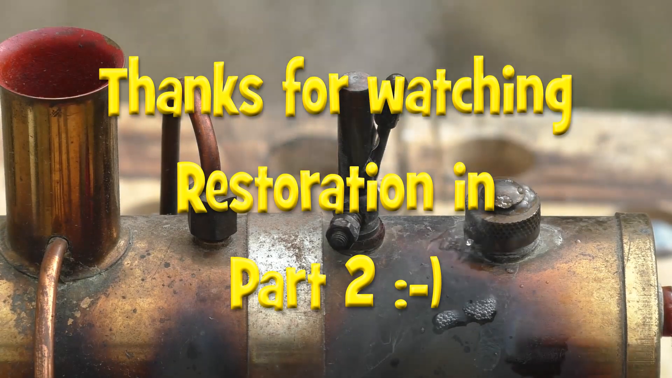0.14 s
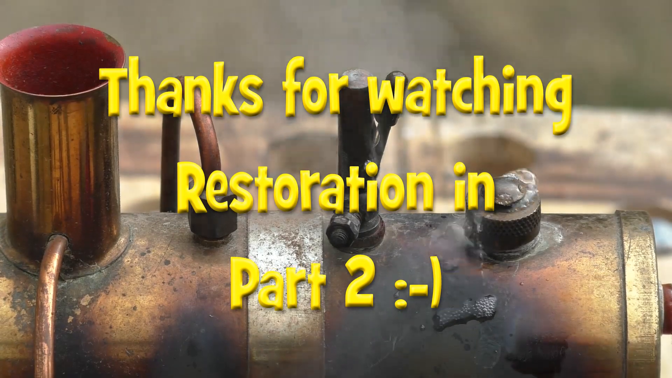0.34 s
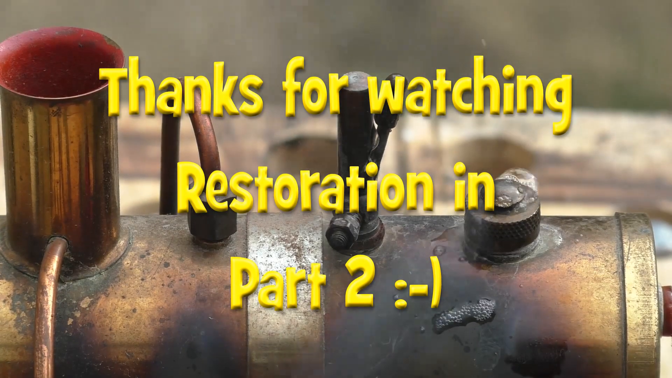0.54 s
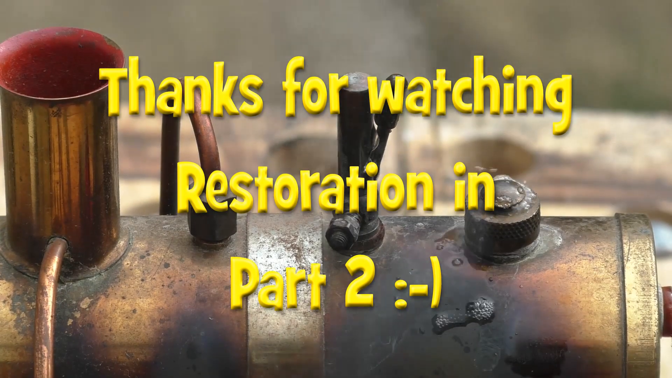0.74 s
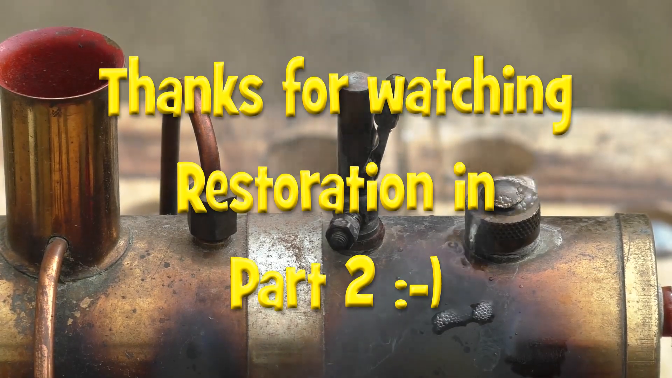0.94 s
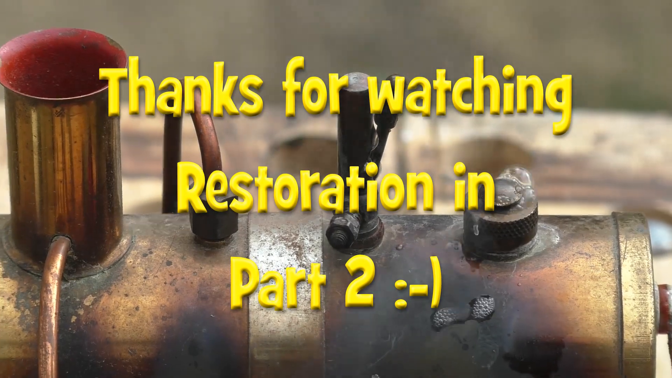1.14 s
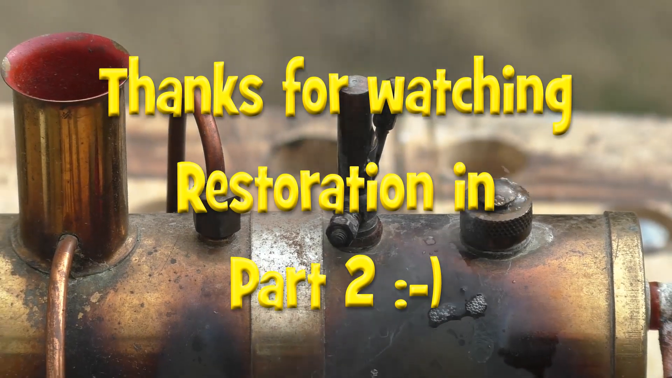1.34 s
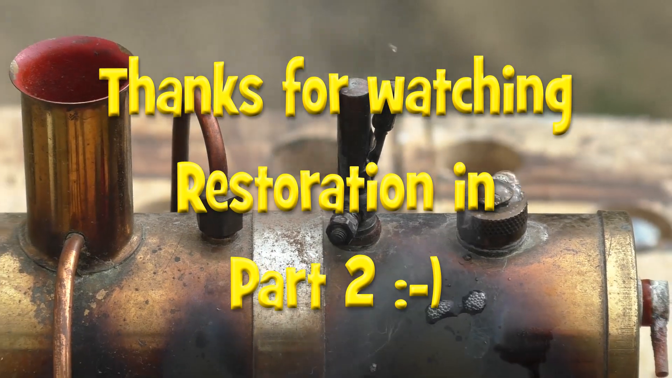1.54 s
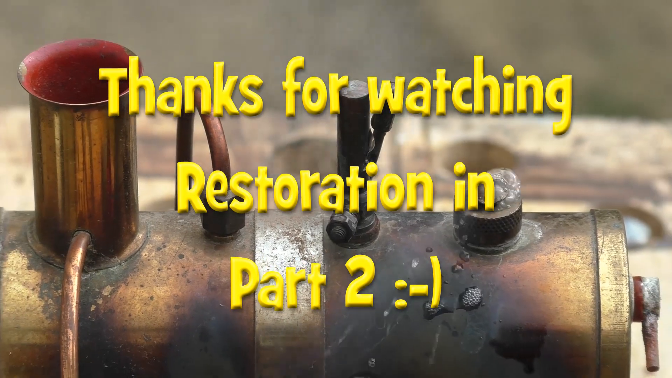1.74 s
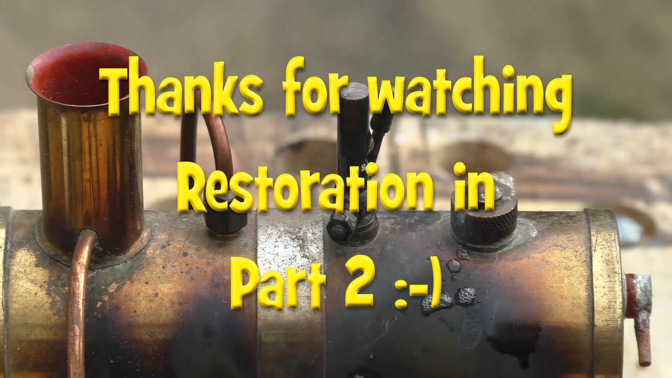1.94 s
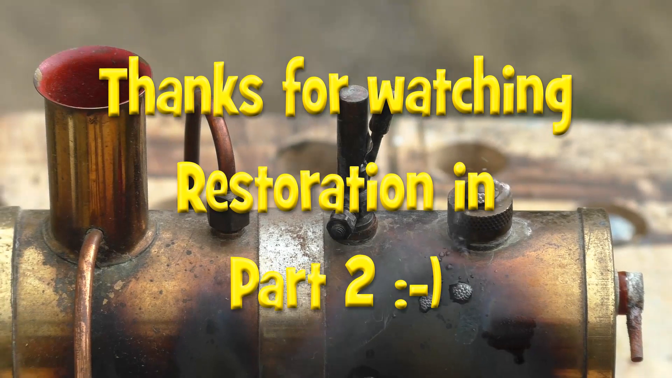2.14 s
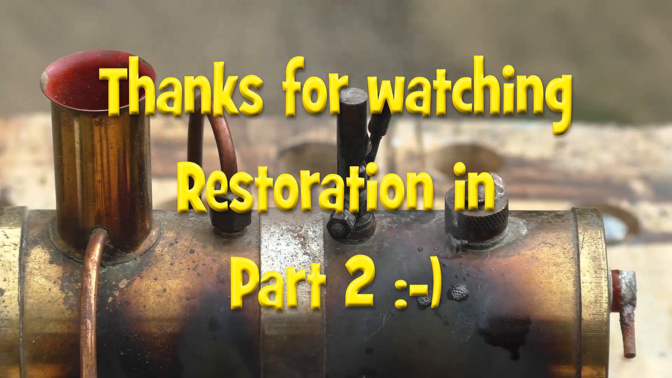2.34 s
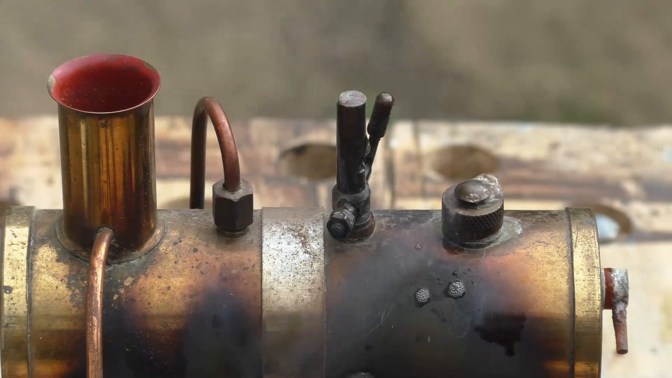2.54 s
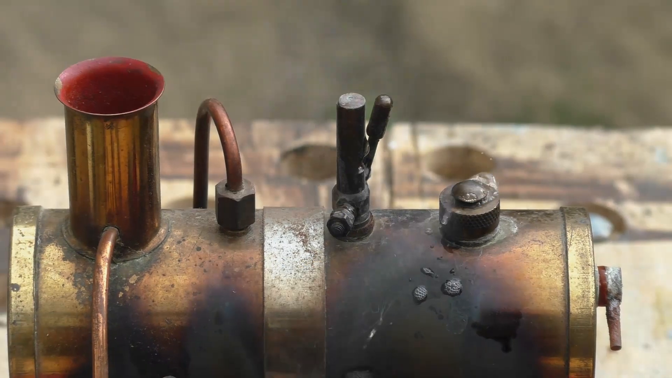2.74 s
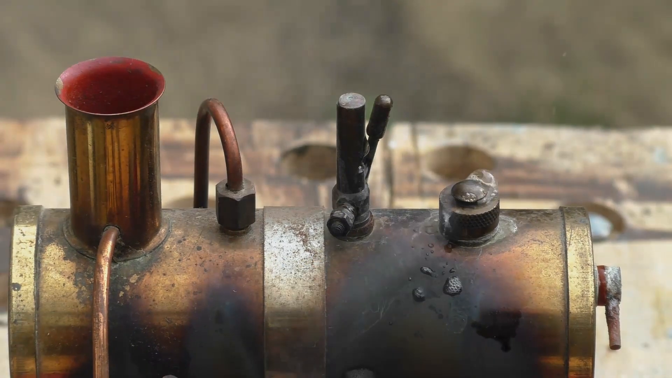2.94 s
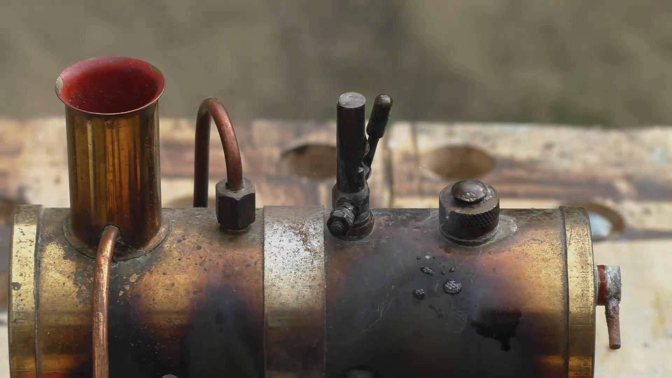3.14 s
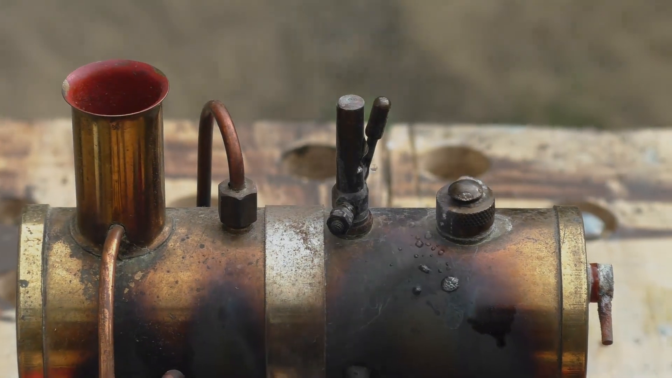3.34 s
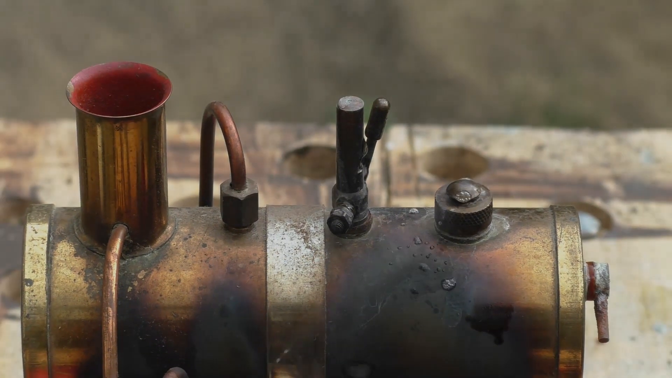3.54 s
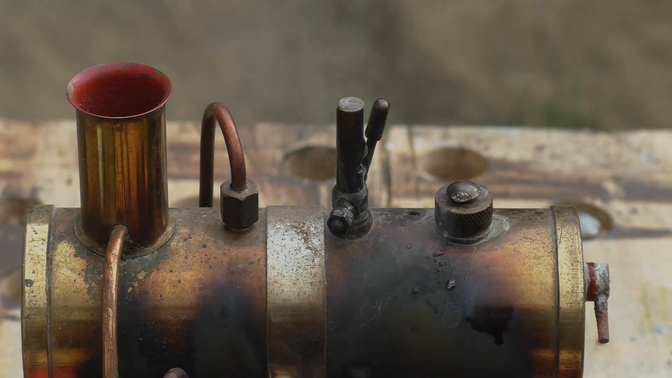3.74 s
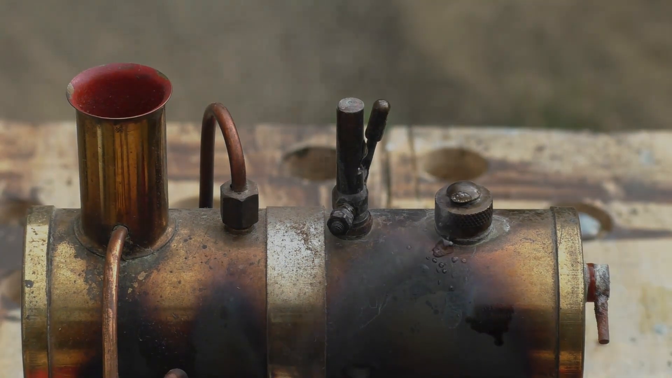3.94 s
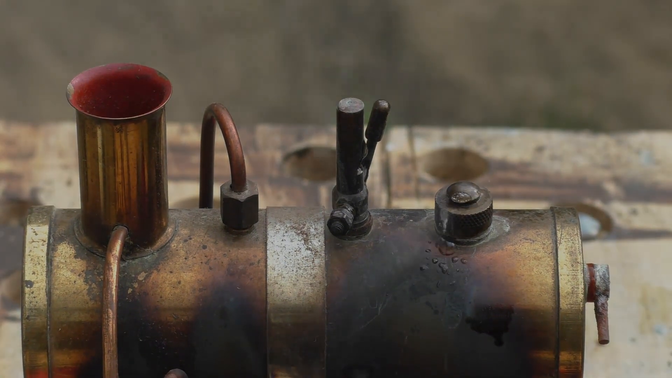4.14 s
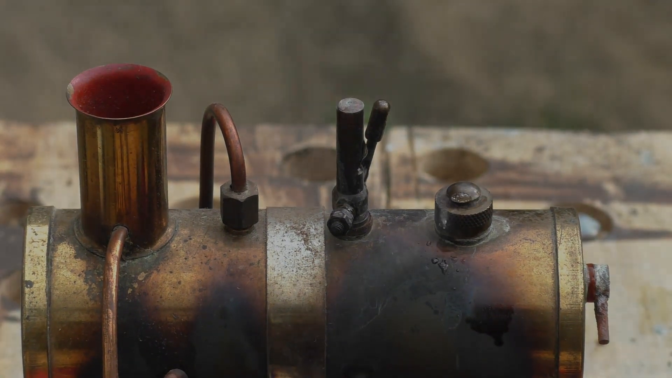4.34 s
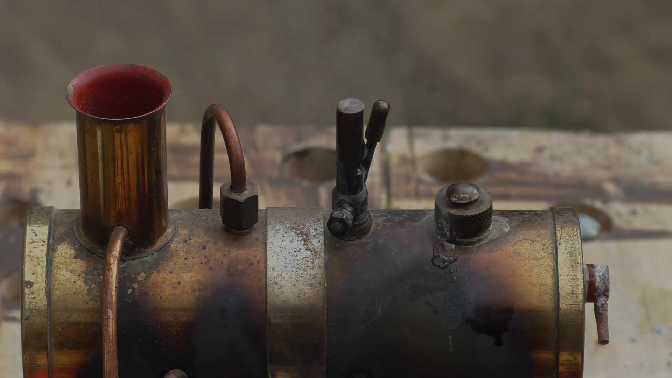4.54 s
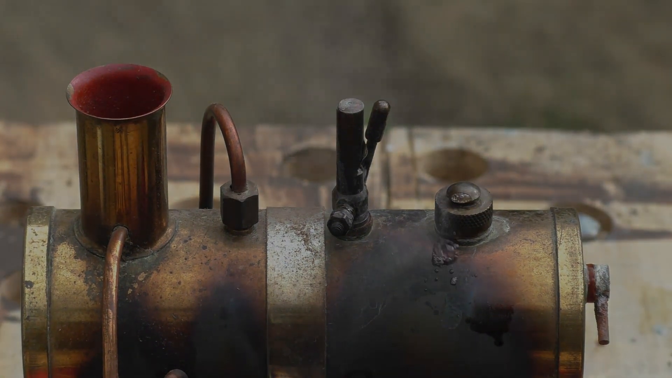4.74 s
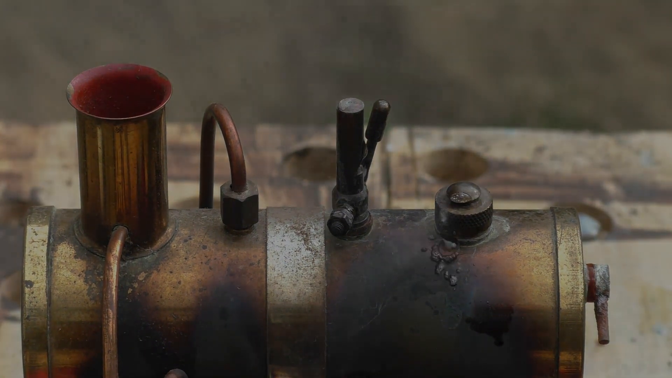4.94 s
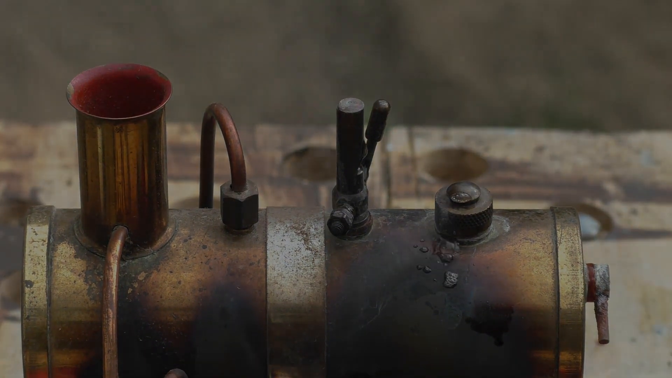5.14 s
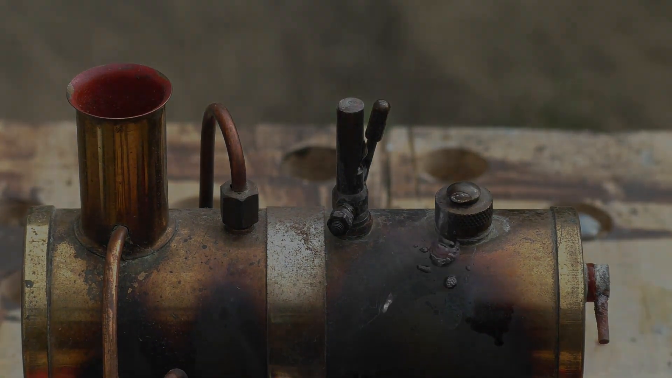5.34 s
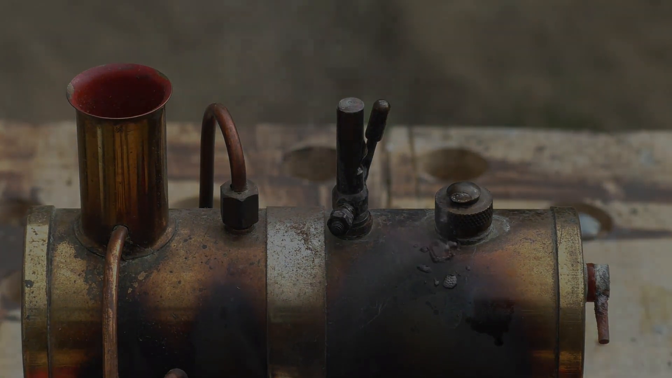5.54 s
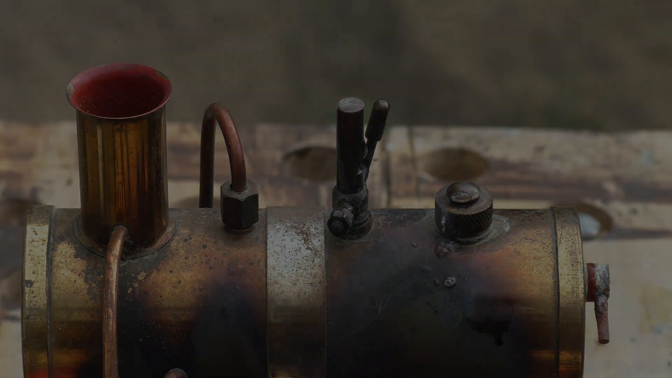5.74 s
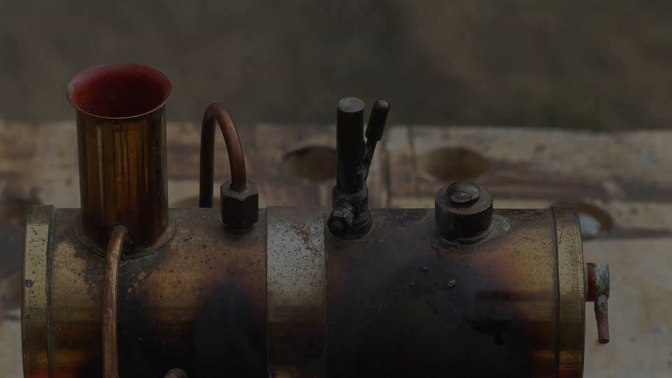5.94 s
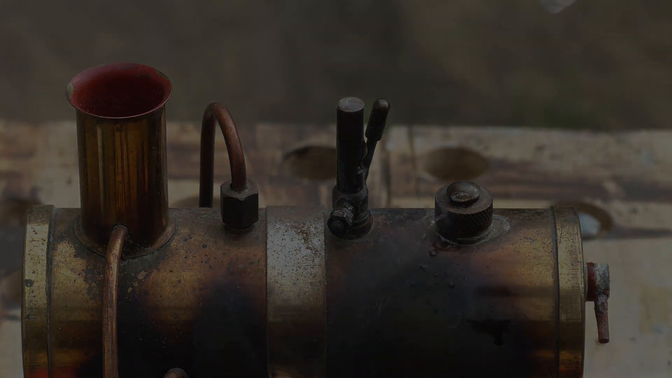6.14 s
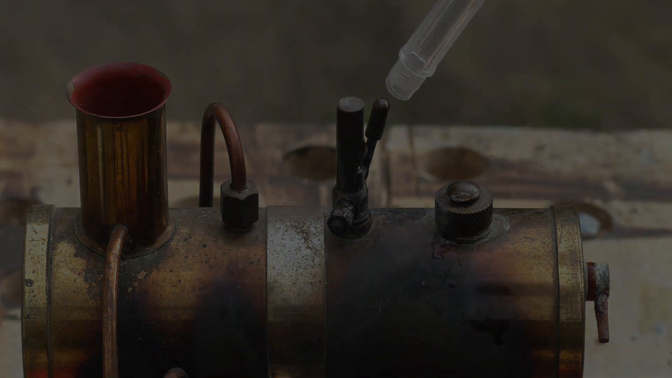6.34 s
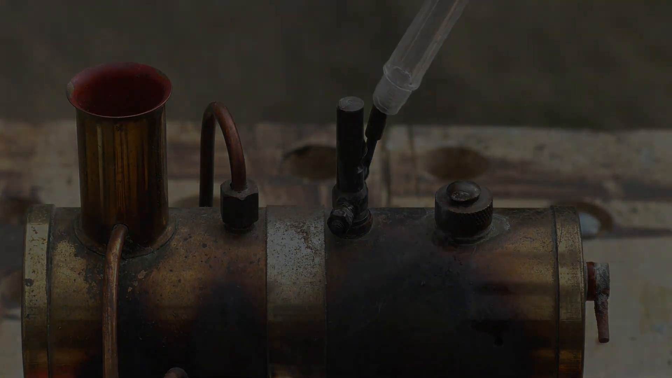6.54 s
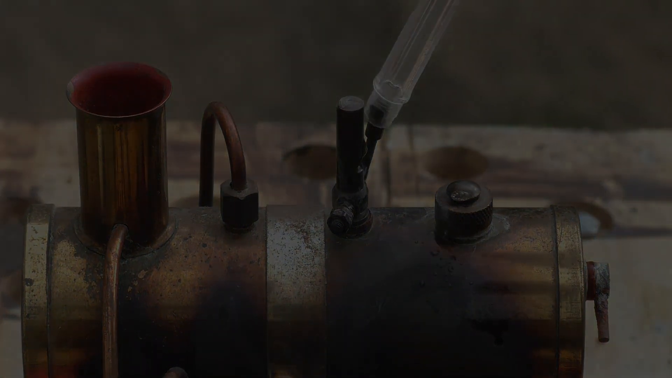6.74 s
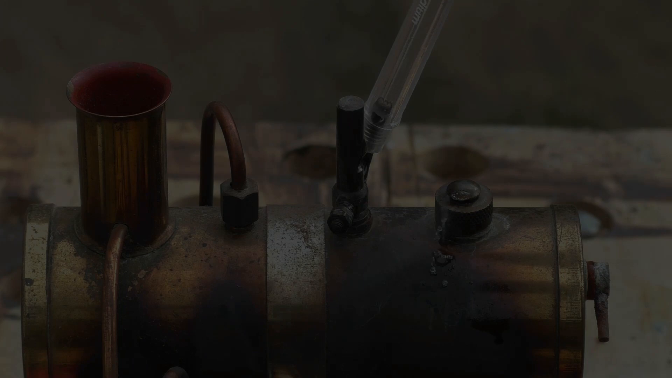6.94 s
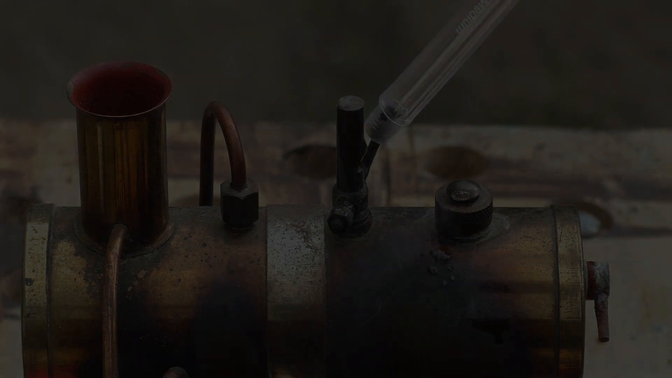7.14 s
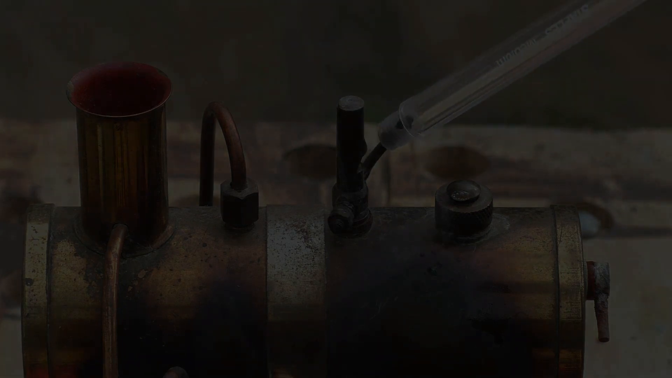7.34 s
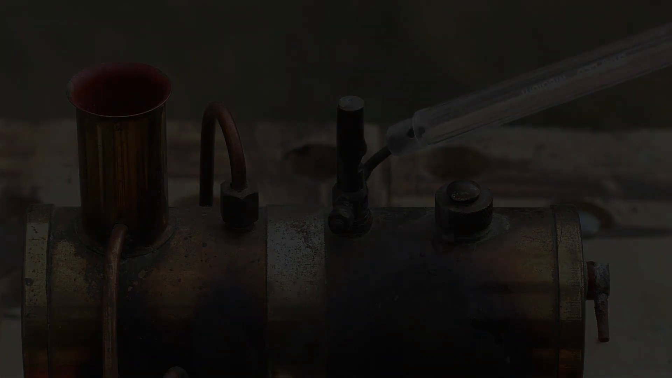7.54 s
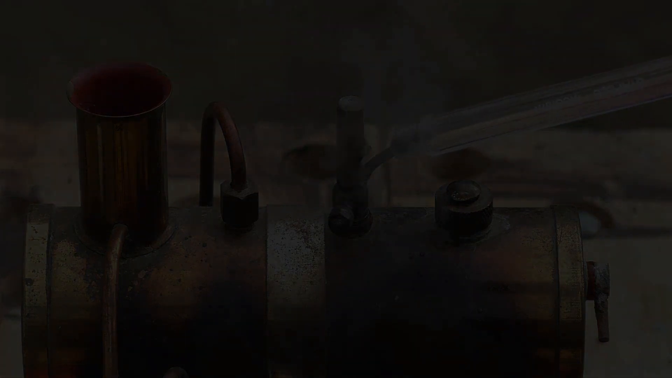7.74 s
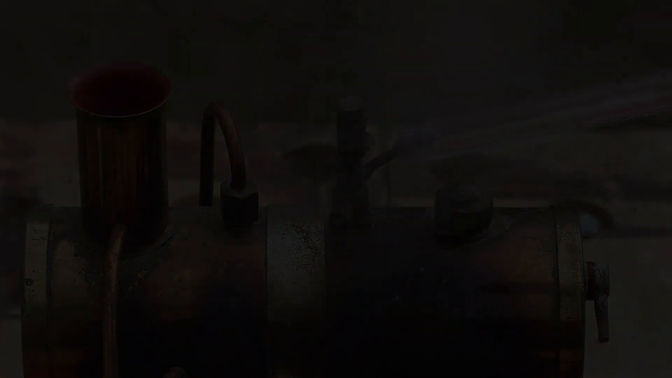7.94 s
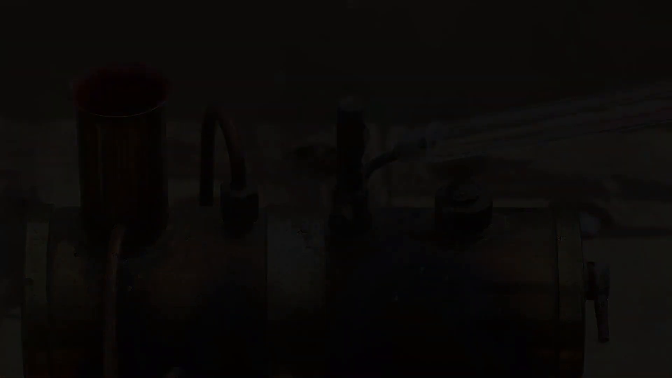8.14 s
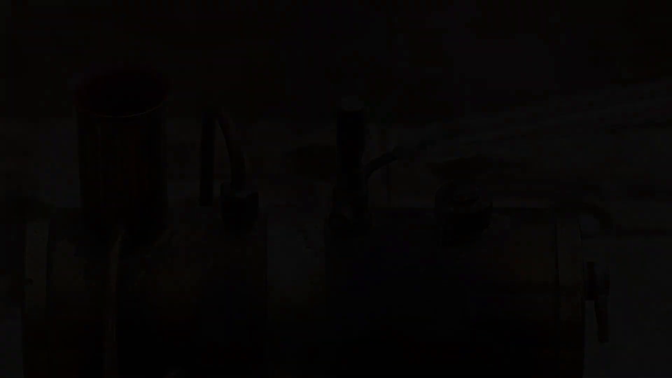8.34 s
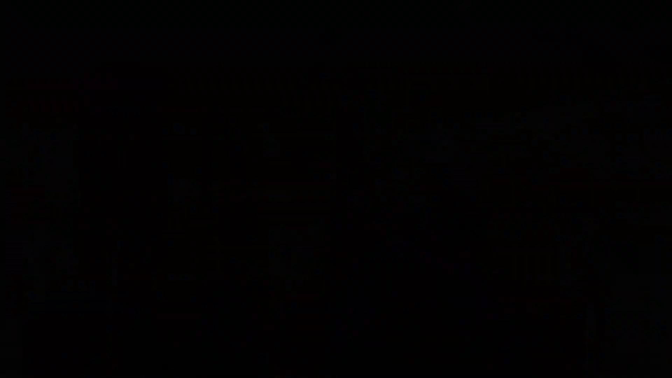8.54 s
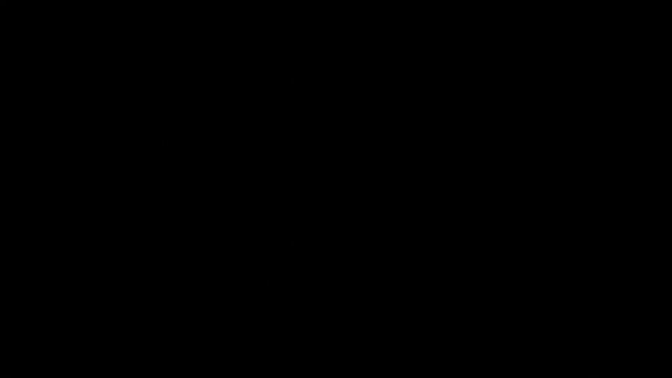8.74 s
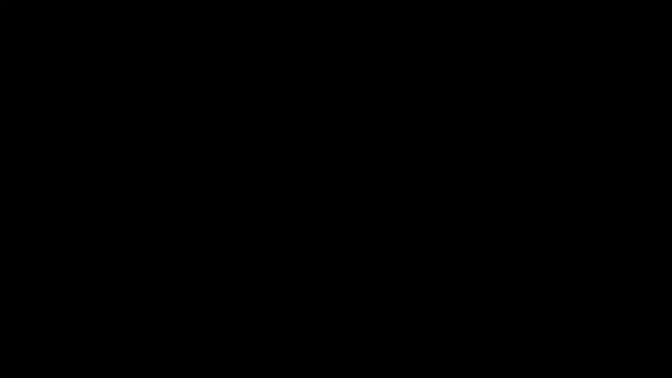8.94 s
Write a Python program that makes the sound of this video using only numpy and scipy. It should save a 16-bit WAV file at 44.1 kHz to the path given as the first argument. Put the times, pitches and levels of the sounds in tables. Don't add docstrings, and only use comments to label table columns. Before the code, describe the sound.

A toy boiler leaks a bright, sputtering hiss over faint rumble; a rod clicks on a lever, steam bursts out and a piercing whistle blows.

```python
import sys
import numpy as np
from scipy import signal
from scipy.fft import rfft, irfft
from scipy.io import wavfile
from scipy.ndimage import uniform_filter1d

SR = 44100
rng = np.random.default_rng(int(sys.argv[2]) if len(sys.argv) > 2 else 0)


def generate_wav(signal):
    frames = np.transpose(np.atleast_2d(signal))
    scaled = np.clip(frames, -1, 1) * 32767
    pcm = np.round(scaled).astype(np.int16)
    wavfile.write(sys.argv[1], SR, pcm)


def ratio(d):
    e = np.asarray(d, float) / 20
    return 10 ** e


N = 400412
T = np.arange(N) / SR

# (frequency [Hz], density [dB per Hz])
LEAK_TONE = [(100, -40), (150, -19), (193, -6), (308, -18), (455, -10), (1300, -11.5), (1450, -8),
             (2430, -3), (5700, -4), (7400, -5.5), (8400, 0), (11200, 1.5), (13500, -.5), (15700, -3)]
# (frequency [Hz], density [dB per Hz])
LEAK_SIDE = [(100, -50.5), (190, -23), (310, -32), (460, -31), (1200, -30.5), (1500, -48.5), (5900, -22.5),
             (6500, -11.5), (8400, -6.5), (11200, -4), (15700, -7)]
# (centre [Hz], width [Hz], lift [dB])
RIPPLES = [(207.6, 91, 5.5), (433, 49, 5), (640, 290, 2.5), (1414, 68, 5), (1764, 83, -6.5), (2118, 54, 5),
           (2446, 165, 3), (2967, 25, 5), (3300, 130, -4.5), (3550, 80, -4.5), (3856, 79, 3), (4270, 48, 8),
           (4690, 65, 4), (5270, 68, 2.5), (5040, 45, -3.5), (5470, 47, 8.5), (5773, 184, 6.5),
           (6470, 97, 1), (6860, 80, 2.5), (6700, 65, -4), (7670, 460, -5.5)]
# (centre [Hz], width [Hz], lift [dB])
SIZZLE_RIPPLES = [(8920, 230, 1), (10050, 1700, -3), (12250, 1200, -5.5), (14440, 700, -3.5)]
# (time [s], jet level [dB])
JET = [(0.0, -25), (0.04, -26.5), (1.19, -26), (2.48, -27.5), (4.1, -26.5), (4.32, -28.5), (4.36, -26),
       (4.47, -27.5), (5.46, -28), (5.52, -25.5), (5.85, -28.5), (5.98, -25.5), (6.22, -28.5), (6.99, -23),
       (7.42, -28.5), (7.75, -27)]
HISS_FOLLOWS, WASH_FOLLOWS = 0.21, 0.16
LEVER_S, LEVER_RISE_S, LEVER_HISS_DB = 6.95, 0.18, 2

# (time [s], echo delay [ms], echo strength [0-1])
HAND_ECHO = [
    (5.6, 2.1, 0),
    (5.9, 1.25, .3),
    (6.1, .8, .5),
    (6.2, .61, .58),
    (6.3, .525, .55),
    (6.5, .474, .52),
    (7.0, .497, .5),
    (7.45, .53, .55),
    (8, .54, .4),
]
# (centre [Hz], width [Hz], lift [dB])
SHADE = [(1190, 170, -1.5), (1720, 560, 3), (2184, 250, -5), (2610, 250, 4), (232, 115, 4),
         (8020, 560, 1.5), (9400, 950, -2), (12300, 1200, 0)]
SHADE_IN = [6.15, 6.3]

# (frequency [Hz], density [dB per Hz])
RUMBLE_TONE = [(12, -48), (20, -18), (32, -18), (57, -1.5), (92, 3), (113, 2), (140, -32), (170, -5.5),
               (220, -35.5), (370, -120)]
# (time [s], level [dB])
LOW_CUT = [(8.05, 1.5), (8.35, -18), (8.95, -19), (9.08, -1)]
RUMBLE_DB, RUMBLE_DRIFT_DB = -55.5, 1.5
HUM_S, HUM_LENGTH_S, HUM_LIFT_DB, HUM_HZ = 2.3, 1.8, 9, 104

SWOOP_S, SWOOP_LENGTH_S, SWOOP_DB, SWOOP_RISE_DB = 5.62, 0.308, -41, 24
SWOOP_FROM_HZ, SWOOP_TO_HZ = 290, 870
CUP_S, CUP_DB, CUP_HZ, CUP_HOLD_S, CUP_FADE_DB_PER_S = 6.2, -43.5, 413, 0.75, 16
# (time [s], peak [dB], ring [Hz], decay by 60 dB [s])
KNOCKS = [
    (5.779, -31, 290, .05),
    (6.175, -19, 2000, .014),
    (6.176, -22, 3300, .01),
    (6.194, -22, 400, .025),
    (6.207, -23, 2000, .014),
    (6.217, -21, 1900, .022),
    (6.218, -26, 1000, .02),
    (6.224, -25, 450, .025),
    (6.719, -21, 1450, .022),
    (6.72, -25, 2500, .02),
]
# (time [s], level [dB])
SCRAPE = [(6.186, -70), (6.194, -32), (6.23, -32), (6.27, -37), (6.33, -70)]

# (time [s], level [dB])
FLOW = [
    (7.6, -34),
    (7.66, -30),
    (7.72, -38),
    (7.815, -25.5),
    (7.84, -26),
    (7.92, -21),
    (8.15, -22.5),
    (8.27, -22),
    (9.08, -23.5),
]
# (frequency [Hz], density [dB per Hz])
RUSH_TONE = [(100, -29), (300, -18), (1200, -20.5), (1600, -16), (2500, -9), (3300, -11.5), (4200, -9),
             (4900, 1.5), (5800, -6.5), (7000, -8), (7650, -19), (8400, 0.5), (9500, -10), (10600, -5.5),
             (12000, -11.5), (14300, -11), (15500, -11)]
LOCK_FROM_S, LOCK_TO_S = 7.858, 8.2
SIZZLE_LOOSE_DB, SIZZLE_LOCKED_DB = -7, 3
BREATH_LOOSE_DB, BREATH_LOCKED_DB = 2, 15
NOTE_HZ, CLIMB_HZ = 6455, 330
TONE_DB, TONE_GROWTH_DB = 7, 40
CALM_S, CALMING_S, WOBBLE_WILD, WOBBLE_CALM, STEADY_PER_DB = 8.28, .1, .8, .24, .08
SAG_S, SAG_DB_PER_S = 8.78, 12
# (time [s], length [s], pitch shift [Hz], level change [dB])
FALTERS = [(8.06, .05, -75, 1.5), (8.085, .016, 0, -8), (8.125, .07, 40, -1.5), (8.215, .07, 50, .6),
           (8.402, .022, 95, 1.2), (8.455, .05, -20, 2.6), (8.5, .045, -30, 3), (8.565, .06, 45, -1.5),
           (8.675, .035, 65, 1.5), (8.74, .05, -10, 2.2), (8.805, .05, 55, -1.2), (8.87, .06, -10, 2.2),
           (8.92, .045, 80, -1.2), (8.992, .022, 105, -6), (9.018, .025, -10, 2.5), (9.047, .03, 55, -2.5),
           (9.087, .035, 165, 4)]
# (delay [ms], strength [ratio])
LEFT_PATHS = [(.02, 1), (2.4, .15), (19, .08)]
# (delay [ms], strength [ratio])
RIGHT_PATHS = [(0, 1), (3.945, .45), (23, .1)]
# (time [s], gain [dB])
GAIN = [(7.8, 0), (7.9, -2), (8.02, -12), (8.15, -19), (8.55, -21.5), (8.78, -21.5), (9.08, -18)]
BASS_HZ, EDGE_HZ = 150, 15730


def evened(x):
    return x / np.sqrt(np.mean(np.abs(x) ** 2) + 1e-20)


def read(points, hz):
    f, value = np.transpose(points)
    return np.interp(np.log(hz + 1), np.log(f + 1), value)


def curves(rows, t):
    s, *columns = np.transpose(rows)
    return [np.interp(t, s, c) for c in columns]


def bumps(rows, x):
    return sum(height * np.exp(-.5 * ((x - centre) / (width / 2.55)) ** 2) for centre, width, height in rows)


def ramp(t, start_s, end_s):
    return np.clip((t - start_s) / (end_s - start_s), 0, 1)


def grid(size):
    return np.fft.rfftfreq(size, 1 / SR)[:, None], np.arange(4 * N // size + 5) * size / 4 / SR


def noise(field_db, gain=1):
    a, b = rng.standard_normal((field_db.shape[1], field_db.shape[0], 2)).T
    size = 2 * field_db.shape[0] - 0.5
    spectra = (a + 1j * b) * ratio(field_db) * gain
    x = signal.istft(spectra, nperseg=size, noverlap=size * 3 // 4)[1][:N]
    return x / np.sqrt(size * .75)


def per_band(tone_db, hz, lo, hi):
    inside = (hz > lo) & (hz < hi)
    return tone_db - 10 * np.log10(np.mean(ratio(tone_db) ** 2 * inside))


def drift(count, rate_hz, step):
    b, a = signal.butter(2, min(rate_hz * step * 2, .9))
    return evened(signal.lfilter(b, a, rng.standard_normal(count)))


def patchy(t, hz, frames, bins):
    field = uniform_filter1d(rng.standard_normal((len(t), len(hz))), frames, 0)
    return evened(uniform_filter1d(field, bins, 1)).T


def resonate(x, hz, width):
    turn = np.exp(2j * np.pi * np.cumsum(hz * np.ones(len(x))) / SR)
    r = np.exp(-np.pi * width / SR)
    return 2 * (turn * signal.lfilter([1 - r], [1, -r], x / turn)).real


def resonate_twice(x, hz, width):
    return evened(resonate(resonate(x, hz, width), hz, width))


def leak():
    hz, t = grid(size=512)
    jet_db = curves(JET, t)[0] + 1.81
    change_db = jet_db - jet_db.mean()
    seep_db = LEVER_HISS_DB * ramp(t, LEVER_S, LEVER_S + LEVER_RISE_S)
    high = 1 / (1 + (6500 / (hz + 1)) ** 8)
    low = 1 / (1 + (hz / 1300) ** 6)
    level_db = jet_db + (1 - high - low) * (seep_db - (1 - HISS_FOLLOWS) * change_db)
    level_db = level_db - low * (1 - WASH_FOLLOWS) * change_db
    patches = patchy(t, hz, frames=25, bins=14)
    spit = drift(len(t), 31, t[1]) * 0.36 * high + drift(len(t), 19, t[1]) * 0.4
    shade_db = bumps(SHADE, hz) * np.interp(t, SHADE_IN, [0, 1])
    level_db = level_db + 0.51 * patches + spit + shade_db

    delay_ms, strength = curves(HAND_ECHO, t)
    reach = 1 / (1 + (hz / 8200) ** 8) / (1 + (4700 / (hz + 1)) ** 6)
    echo = 1 - strength * reach * np.exp(-2j * np.pi * hz * delay_ms / 1000)
    mid = noise(level_db + per_band(read(LEAK_TONE, hz), hz, 7100, 13950), echo)
    side = noise(level_db + per_band(read(LEAK_SIDE, hz), hz, 7700, 16200) - 3.0)

    fine = np.fft.rfftfreq(N, 1 / SR)
    shaped = rfft(mid) * ratio(bumps(RIPPLES + SIZZLE_RIPPLES, fine) + 3.5)
    side = side + irfft(0.168 * shaped * (fine > 11500), N)
    return irfft(shaped, N) + np.array([side, -side])


def droplets():
    out, t = np.zeros(N), np.arange(400) / SR
    for hz in np.geomspace(700, 9000, 12):
        strength = ratio(4.1 * np.minimum(rng.exponential(1, N), 4))
        hits = strength * (rng.random(N) < 14 / SR)
        ring = np.sin(2 * np.pi * hz * t) * hz * t * np.exp(-hz * t / 2.0)
        out += signal.oaconvolve(hits, ring)[:N] * np.sqrt(hz)
    return ratio(-48) * evened(out)


def rumble():
    hz, t = grid(size=2048)
    level_db = RUMBLE_DB + RUMBLE_DRIFT_DB * drift(len(t), 4.4, t[1])
    hum_db = bumps([(HUM_S, HUM_LENGTH_S, HUM_LIFT_DB)], t) * bumps([(HUM_HZ, 26, 1)], hz)
    field_db = per_band(read(RUMBLE_TONE, hz), hz, 40, 140) + level_db + hum_db
    field_db = field_db + curves(LOW_CUT, t)[0] - 60 * (hz > 175)
    mid, side = noise(field_db), noise(field_db - 20)
    return np.array([0.92 * mid + side, 1.07 * mid - side])


def hand():
    near = ramp(T, SWOOP_S, SWOOP_S + SWOOP_LENGTH_S)
    swoop = ratio(SWOOP_DB - SWOOP_RISE_DB * (1 - near) ** 2) * (T > SWOOP_S) * (near < 1)
    fade_db = CUP_FADE_DB_PER_S * np.maximum(T - CUP_S - CUP_HOLD_S, 0)
    cup = ratio(CUP_DB - fade_db) * ramp(T, CUP_S - .03, CUP_S)
    rising_hz = SWOOP_FROM_HZ + (SWOOP_TO_HZ - SWOOP_FROM_HZ) * near
    wash_hz = np.where(near < 1, rising_hz, CUP_HZ)
    wash = resonate_twice(rng.standard_normal(N), wash_hz, 240)
    out = uniform_filter1d(swoop + cup, size=800) * wash

    scrape_db = curves(SCRAPE, T)[0]
    out += ratio(scrape_db) * evened(resonate(rng.standard_normal(N), 1100, 2100))
    out += ratio(scrape_db + 4.0) * evened(resonate(rng.standard_normal(N), 4400, 2600))

    t = T[:SR // 4]
    for s, db, hz, t60 in KNOCKS:
        out[round(s * SR):][:len(t)] += ratio(db - 60 * t / t60) * np.sin(2 * np.pi * hz * t)
    return out


def grip(t):
    return 1 - (1 - ramp(t, LOCK_FROM_S, LOCK_TO_S)) ** 2


def rush():
    hz, t = grid(size=512)
    body_db = curves(FLOW, t)[0]
    sizzle_db = SIZZLE_LOOSE_DB + (SIZZLE_LOCKED_DB - SIZZLE_LOOSE_DB) * grip(t)
    field_db = per_band(read(RUSH_TONE, hz), hz, 4730, 5120) + body_db - 60 * (t < 7.6)
    field_db = field_db + (sizzle_db - 2.0) * (hz > 7650) + 1.0 * drift(len(t), 51, t[1])
    field_db = field_db + 2.1 * patchy(t, hz, frames=40, bins=12)
    mid = noise(field_db)
    side = noise(field_db - 5.5 - 10 * np.log10(1 + (5500 / (hz + 1)) ** 8))
    return np.array([mid + side, mid - side])


def whistle():
    firm_db = bumps([(s, length, db) for s, length, _, db in FALTERS], T)
    firmer_db = np.maximum(firm_db, 0)
    climb_hz = CLIMB_HZ * (1 - ramp(T, LOCK_FROM_S, LOCK_TO_S))
    hz = NOTE_HZ - climb_hz + bumps([row[:3] for row in FALTERS], T)
    breath_db = curves(FLOW, T)[0] + BREATH_LOOSE_DB + (BREATH_LOCKED_DB - BREATH_LOOSE_DB) * grip(T)
    breath_db = breath_db - 0.86 * firmer_db
    tone_db = TONE_DB - TONE_GROWTH_DB * (1 - grip(T)) + firm_db
    wobble = WOBBLE_WILD + (WOBBLE_CALM - WOBBLE_WILD) * ramp(T, CALM_S - CALMING_S, CALM_S)
    wobble = np.maximum(wobble - STEADY_PER_DB * firmer_db, 0)

    air = rng.standard_normal(N)
    wide = (1 - grip(T)) ** 2
    breath = np.sqrt(1 - wide) * resonate_twice(air, hz + 150, 470)
    breath += np.sqrt(wide) * resonate_twice(air[::-1], hz, 1080)

    gust = 2 * np.tanh(drift(N, 76, 1 / SR) / 2)
    turns = np.cumsum(hz + wobble * (40 * drift(N, 59.0, 1 / SR) - 35 * gust)) / SR
    tone = ratio(4.8 * wobble * (gust - 0.91 * gust ** 2)) * np.sin(2 * np.pi * turns) * np.sqrt(2)
    tone += ratio(-40) * np.sin(4 * np.pi * turns)

    sag_db = SAG_DB_PER_S * np.maximum(T - SAG_S, 0)
    source = ratio(-sag_db) * (ratio(breath_db) * breath + ratio(tone_db) * tone) * (T > 7.72)
    ears = []
    for paths in (LEFT_PATHS, RIGHT_PATHS):
        ears.append(sum(g * np.roll(source, round(ms * SR / 1000)) * (T > 1) for ms, g in paths))
    return np.array(ears) * ratio([[1.1], [-.6]])


def scene():
    no_bass = signal.butter(6, BASS_HZ, "high", fs=SR, output="sos")
    steam = leak() + droplets() + hand() + rush() + whistle()
    return signal.sosfilt(no_bass, steam) + rumble()


def band_limit(x):
    return signal.sosfilt(signal.butter(12, 16750, fs=SR, output="sos"), x)


def record(dry):
    ducked = dry * ratio(curves(GAIN, T)[0])
    edge = signal.firwin(801, EDGE_HZ, window=("kaiser", 9), fs=SR)
    limited = signal.oaconvolve(ducked, edge[None], "same")
    return band_limit(limited)


dry = scene()
out = record(dry)
generate_wav(out)
```